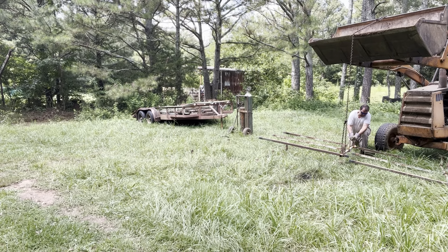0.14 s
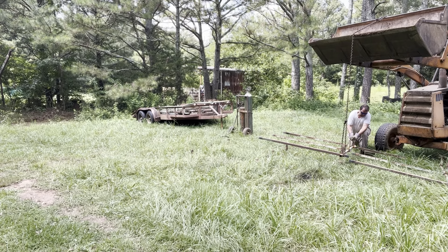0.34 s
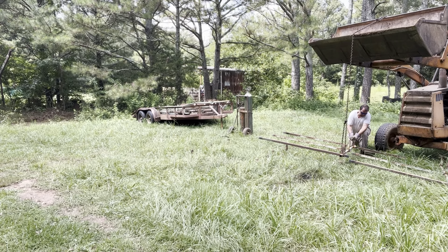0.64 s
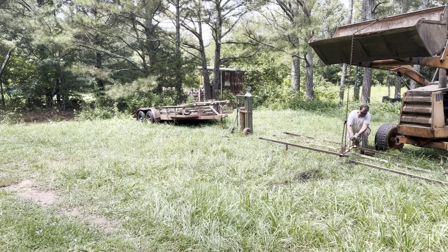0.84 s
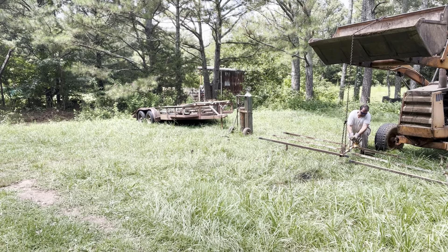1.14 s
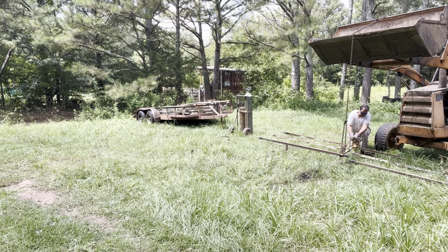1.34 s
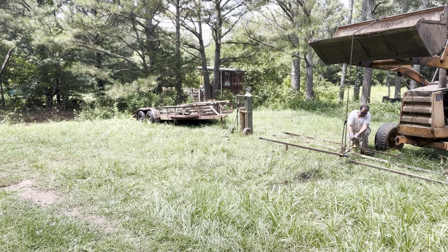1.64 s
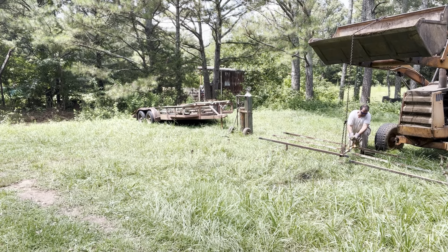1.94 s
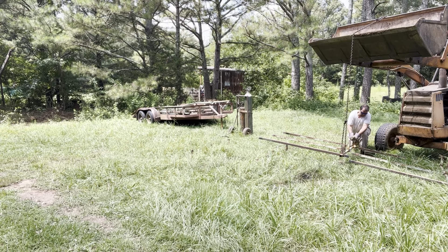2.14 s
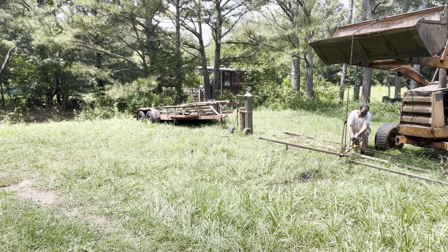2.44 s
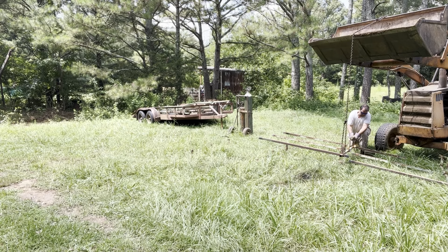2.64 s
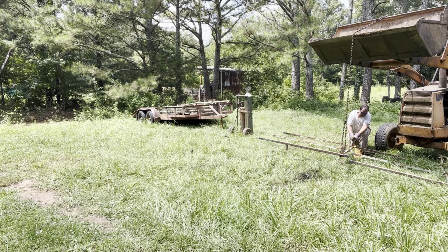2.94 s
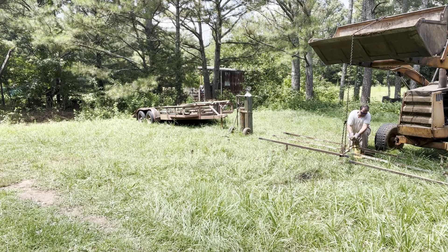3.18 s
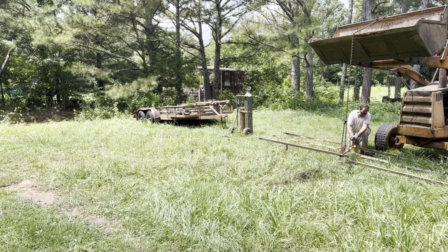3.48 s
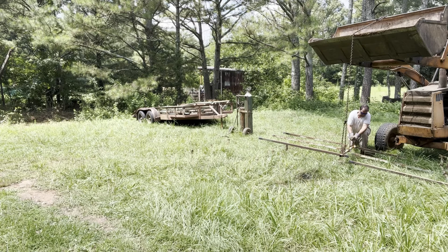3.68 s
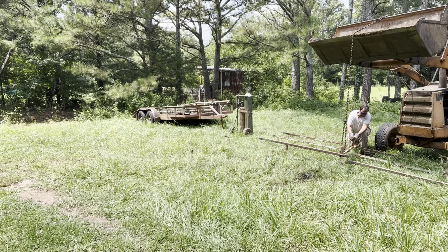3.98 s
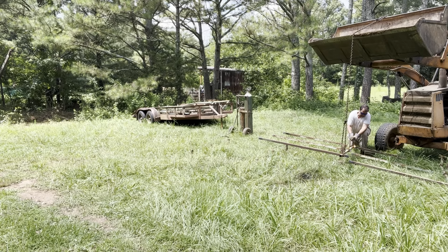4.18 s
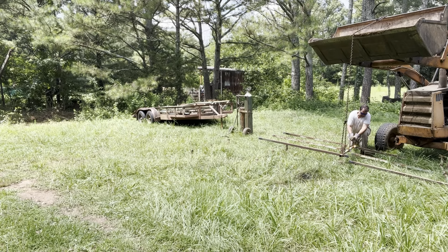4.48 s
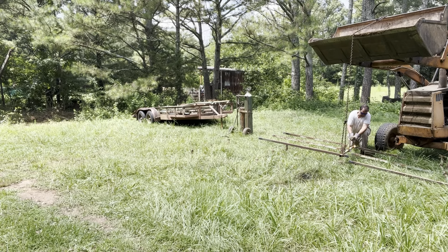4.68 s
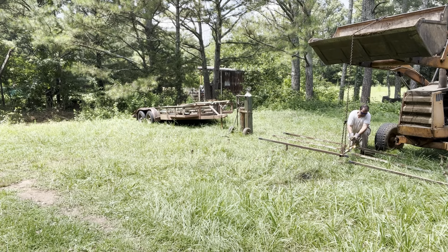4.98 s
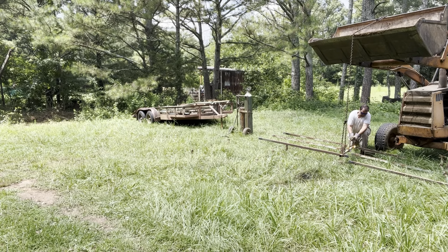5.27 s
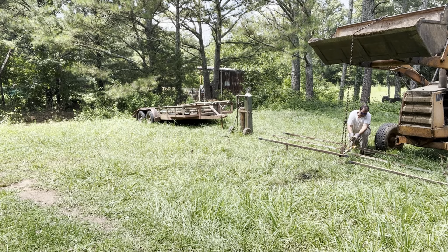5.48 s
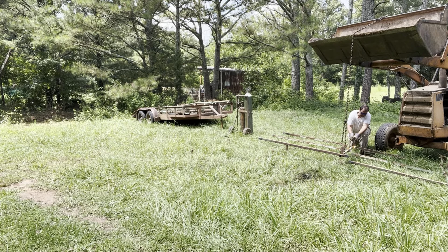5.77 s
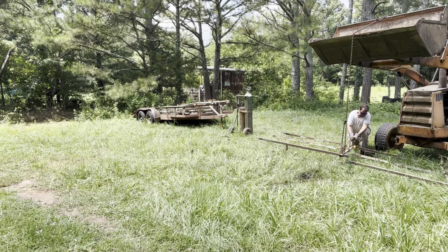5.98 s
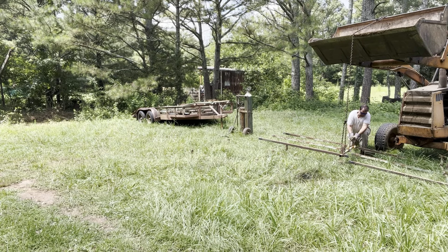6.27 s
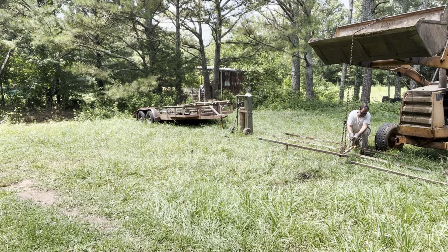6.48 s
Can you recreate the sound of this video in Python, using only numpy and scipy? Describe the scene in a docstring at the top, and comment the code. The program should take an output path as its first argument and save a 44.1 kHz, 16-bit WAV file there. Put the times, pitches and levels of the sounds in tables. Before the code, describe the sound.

Harsh, breathy torch jet cutting scrap metal some metres away, swelling and flaring, nearly dropping out near the end, above a low far-off hum.

```python
"""A gas torch cuts scrap steel on a lawn, some metres from a pair of microphones, under a loader's raised bucket.
From the start the oxygen jet hisses, wavering slightly at random throughout, and the bucket throws the hiss
back; far away an engine hums, its tones fading in and out over a low rumble. From half a second in, short
flares lift the jet. At 1 s it bites into the steel and fills out; at 5.9 s it nearly drops out, then partly recovers.
Jet, its faint grain and rumble are shaped noise; the engine is a set of sines tied to one shaft speed."""
import sys
import numpy as np
from scipy import signal
from scipy.fft import rfft, irfft
from scipy.io import wavfile

SR = 44100
rng = np.random.default_rng(int(sys.argv[2]) if len(sys.argv) > 2 else 0)


def output_pcm(signal):
    """Save a mono or channel-first signal as 16-bit PCM at the path in sys.argv[1].

    Samples are clipped to [-1, 1] before scaling.
    """
    pcm = np.clip(np.atleast_2d(signal).T, -1, 1) * 32767
    wavfile.write(sys.argv[1], SR, np.round(pcm).astype(np.int16))


N = 291942
TIME = np.arange(N) / SR
HZ = np.fft.rfftfreq(N, 1 / SR)
# the time and frequency grid on which the torch's level moves
FRAME_S = np.arange(N // 128 + 9) * 128 / SR
BIN_HZ = np.fft.rfftfreq(512, 1 / SR)


def amp(db):
    """Decibels to gain."""
    return 10 ** (np.asarray(db) / 20)


def unit(x):
    """Scales to an rms of 1."""
    return x / np.sqrt(np.mean(x ** 2) + 1e-20)


def over_hz(table, hz, axis=1):
    """One column of a table, read along log frequency."""
    table = np.array(table)
    return np.interp(np.log(hz + 1), np.log(table[:, 0] + 1), table[:, axis])


def over_time(table, t):
    """All columns of a curve, read at the times t."""
    s, *columns = np.transpose(table)
    return [np.interp(t, s, column) for column in columns]


def drift(t, rate):
    """Slow chance of rms 1, its changes rolling off above the given rate a second."""
    f = np.fft.rfftfreq(len(t), t[1] - t[0])
    lowpass = (f > 0) / np.sqrt(1 + (f / rate) ** 4)
    return unit(irfft(rfft(rng.standard_normal(len(t))) * lowpass, len(t)))


def patches(span_s, span_hz):
    """A random field of rms 1 over time and frequency, smooth within the given spans."""
    z = np.fft.fft2(rng.standard_normal((len(FRAME_S), len(BIN_HZ))))
    along = np.fft.fftfreq(len(FRAME_S), FRAME_S[1])[:, None] * span_s
    across = np.fft.fftfreq(len(BIN_HZ), BIN_HZ[1]) * span_hz
    return unit(np.fft.ifft2(z * np.exp(-along ** 2 - across ** 2)).real)


def ports(spectra):
    """Two microphone ports: sound from the right reaches the left one late and shaded, and partly unlike."""
    # how the ports differ: hz, left_lead_radians, likeness (0-1), left_over_right_db
    port_table = [(100, -0.3, 0.97, -0.4), (200, -0.55, 0.95, -0.5), (330, -0.75, 0.91, -1.5),
                  (550, -1.15, 0.85, -4.4), (900, -1.3, 0.65, -8), (1300, -1.42, 0.9, -5),
                  (1900, -2.1, 0.88, -0.6), (2150, -3.12, 0.995, 0), (2850, -3.17, 0.995, 0),
                  (3300, -4.8, 0.68, -0.6), (4300, -5.6, 0.68, -2.7), (5200, -7.5, 0.62, -4.4),
                  (6000, -8.5, 0.2, -1.8), (6700, -10.5, 0.62, 1.3), (7400, -10.65, 0.75, 4.3),
                  (8600, -10.4, 0.88, 1.5), (9500, -9.95, 0.87, 0.5), (9900, -9.45, 0.995, 0),
                  (12200, -9.4, 0.995, 0), (12900, -8.85, 0.81, 0), (15200, -7.7, 0.76, 0)]
    lead, likeness, balance_db = (over_hz(port_table, HZ, axis=k) for k in range(1, 4))
    likeness = np.clip(likeness, 0, .995)
    mixed = likeness * spectra[0] + np.sqrt(1 - likeness ** 2) * spectra[1]
    left = mixed * np.exp(1j * lead)
    return irfft(np.array([left * amp(balance_db / 2), spectra[0] * amp(-balance_db / 2)]), N)


def grain(per_s, spread_db):
    """A faint random grain that slightly roughens the hiss: sparse single samples of uneven size."""
    size = amp(spread_db * np.minimum(rng.exponential(1, N), 4)) * rng.choice([-1, 1], N)
    return unit(size * (rng.random(N) < per_s / SR))


def scatter(x, share, decay_s, turns_per_s):
    """Weak reflections ripple the spectrum finely; the pattern shifts slowly as the torch moves."""
    # two random tails, none of it within the first millisecond
    taps = rng.standard_normal((2, N)) * np.exp(-TIME / decay_s) * (TIME > .001)
    one, other = (irfft(rfft(x) * rfft(tail / np.linalg.norm(tail)), N) for tail in taps)
    turn = 2 * np.pi * turns_per_s * TIME
    return x + share * (np.cos(turn) * one + np.sin(turn) * other)


def whistles(flow):
    """The jet blows across the edges of the cut: narrow bands of the hiss swell, slide and fade."""
    # breathy whistles that change with the cut's shape: start_s, end_s, start_hz, end_hz, width_hz, lift_db
    whistle_table = [(-.3, 1.0, 6950, 7000, 150, 3), (1.2, 2.9, 7000, 7180, 180, 4.5),
                     (2.6, 4.3, 7160, 7120, 190, 5), (4.3, 6.9, 7140, 7230, 220, 4.5),
                     (1.2, 3.3, 4035, 4045, 60, 6), (3.0, 4.3, 4030, 3940, 80, 4.5),
                     (1.0, 2.1, 4270, 4220, 80, 4), (1.0, 1.7, 5330, 5340, 90, 4),
                     (2.7, 3.5, 5330, 5310, 120, 3.5), (2.7, 4.4, 6650, 6670, 80, 7),
                     (4.9, 6.9, 6660, 6645, 80, 5.5), (-.3, 2.9, 8385, 8405, 100, 4),
                     (4.8, 6.9, 8410, 8410, 120, 3.5), (2.9, 3.9, 8840, 8900, 150, 3),
                     (2.5, 2.95, 2860, 2900, 170, 6), (3.1, 3.55, 2820, 2800, 130, 4.5),
                     (4.0, 4.6, 2840, 2830, 80, 4), (1.15, 1.72, 10950, 11100, 350, 5),
                     (2.0, 2.4, 11000, 10900, 250, 3.5), (3.9, 4.27, 8740, 8800, 230, 6),
                     (3.85, 4.27, 10220, 10330, 220, 5), (3.95, 4.25, 10850, 10950, 220, 5.5),
                     (4.58, 4.84, 10100, 10200, 400, 7), (4.66, 4.84, 11100, 11220, 350, 6),
                     (4.6, 4.86, 8150, 8150, 300, 3.5), (4.97, 5.35, 12300, 12430, 280, 6)]
    longest_fade_s = .3
    hz, t, z = signal.stft(flow, SR, nperseg=2048, noverlap=1536)
    lift_db = np.zeros(z.shape[1:])
    for start, end, from_hz, to_hz, width, db in whistle_table:
        fade_s = min(longest_fade_s, (end - start) / 3)
        swell = np.clip(np.minimum(t - start, end - t) / fade_s, 0, 1)
        centre = np.interp(t, [start, end], [from_hz, to_hz])
        lift_db = lift_db + db * swell / (1 + (2 * (hz[:, None] - centre) / width) ** 2)
    return signal.istft(z * amp(lift_db), nperseg=2048, noverlap=1536)[1][:, :N]


def flare(start, length):
    """A flare rises, holds and falls: 0-1."""
    rise_s, fall_s = 0.0047, 0.03
    rise = (FRAME_S - start) / rise_s
    fall = 1 - (FRAME_S - start - length) / fall_s
    return np.clip(np.minimum(rise, fall), 0, 1)


def band_levels(body_db=3.0, roar_db=-2.5, rush_db=1.08):
    """Relative dB of body, roar, rush, hiss and top: flares lift the flow; the low parts follow it less."""
    # the jet's steady flow: time_s, strength_db (relative)
    jet_curve = [(0, -42), (.6, -39.3), (.88, -40.8), (.97, -41), (1.02, -38), (1.2, -34.5), (1.5, -34),
                 (1.8, -35.5), (2.15, -35), (2.36, -38), (2.52, -35.3), (2.8, -37.3), (3.27, -33.3),
                 (3.48, -36.8), (3.75, -35), (4.05, -35.2), (4.2, -37.3), (4.45, -40.7), (4.72, -35.5),
                 (4.86, -37), (4.95, -34.7), (5.84, -35.6), (5.93, -44.8), (5.99, -45), (6.04, -42),
                 (6.3, -39.7), (6.62, -39.8)]
    # slow changes of colour: time_s, roar_db, rush_db, top_db (all relative)
    colour_curve = [(0, -1.3, -3.5, -2), (.8, -4, -4, 0), (1.25, -0.5, -2.5, 1), (1.6, 1.5, 0, 0.5),
                    (2.1, 1.5, 1, -1), (2.62, -0.3, -0.4, -3), (2.85, 2.5, -1.5, -5.5), (3.25, 0, -0.5, 2),
                    (3.5, 0.5, 0.5, -2.5), (3.9, .5, -0.4, -2.5), (4.13, 0.5, -2, -3), (4.42, 4, 2.5, -3),
                    (4.85, 0, 0.4, -1.5), (5.7, -2.3, -2, 0), (6.33, 1.5, 0.5, 1.5), (6.62, 2, 0, 0)]
    # flares as the jet blows molten metal out of the cut:
    # start_s, length_s, lift_db, further_roar_lift_db, further_rush_lift_db
    flare_table = [(0.523, 0.072, 0.5, -1.5, 0), (0.735, 0.028, 2.5, -0.5, -2), (1.343, 0.12, 3.7, 0, -2.5),
                   (1.52, 0.07, 4, -1, -1.5), (1.671, 0.056, 4.2, 1, -1), (1.886, 0.048, 2, 4.5, 0),
                   (2.018, 0.037, 2.5, 3, -1), (2.226, 0.036, 4.7, 2.5, -1), (2.406, 0.036, 5, 2.5, 0),
                   (3.2, 0.05, 0, 1.5, 0), (3.385, 0.025, 0.5, 2, 0), (3.55, 0.07, 3, 1, 0),
                   (3.86, 0.12, 2.8, 4, -1.5), (4.677, 0.045, 4, 2.5, -4), (4.745, 0.045, 4.5, 3, -4),
                   (4.865, 0.03, 0, 4, 1)]
    # the flow at ordinary work, and the shares of its changes that body and roar follow
    work_db, body_follows, roar_follows = -39, 0.33, 0.55
    # the body of the flame fills out when the jet pierces the steel
    pierce_s, pierce_rise_s, unpierced_db = 1.11, 0.12, -10

    jet, = over_time(jet_curve, FRAME_S)
    roar, rush, top = over_time(colour_curve, FRAME_S)
    for start, length, jet_lift, roar_lift, rush_lift in flare_table:
        shape = flare(start, length)
        jet = jet + jet_lift * shape
        roar = roar + roar_lift * shape
        rush = rush + rush_lift * shape
    # the jet spits as it first bites: a 4 dB lift of the rush
    rush = rush + 4.0 * flare(start=.998, length=.03)
    unpierced = 1 - np.clip((FRAME_S - pierce_s) / pierce_rise_s, 0, 1)
    body = work_db + body_db + body_follows * (jet - work_db) + unpierced_db * unpierced
    roar = work_db + roar_db + roar_follows * (jet - work_db) + roar
    return body, roar, jet + rush_db + rush, jet, jet + top


def kerf():
    """The slot in the steel rasps with one broad resonance: its lift in dB over time and frequency."""
    # the resonance, strongest while the cut is deep: time_s, lift_db
    kerf_curve = [(0, -1), (.95, -1), (1.15, 3.5), (1.5, 1.5), (2.4, 2), (2.7, 3), (3.3, 2.5), (4.3, 1.5),
                  (4.8, 0), (5.8, 0), (6, 1.5), (6.62, 0)]
    centre_hz, width_hz = 2600, 600
    lift_db, = over_time(kerf_curve, FRAME_S)
    return np.outer(lift_db, np.exp(-((BIN_HZ - centre_hz) / width_hz) ** 2))


def bucket_echo(share, fade_hz):
    """The bucket returns the hiss upside down a moment later, combing the middle of the spectrum."""
    delay_s = .00847
    strength = share * HZ ** 2 / (HZ ** 2 + 600 ** 2) / (1 + (HZ / fade_hz) ** 2)
    return (1 - strength * np.exp(-2j * np.pi * HZ * delay_s)) / np.sqrt(1 + strength ** 2)


def torch(level_db=-29.0, waver_db=.5, patchy_db=1.0, grain_db=-17):
    """Jet turbulence with a faint grain, coloured by the cut and by the echoes round it."""
    # the torch's broad spectrum at full work: hz, density_db (per Hz, relative)
    hiss_table = [(60, -28), (400, -11.5), (850, -9.5), (1200, -4.5), (1750, -0.9), (2100, -2.5),
                  (2400, -3.8), (3300, -4.2), (4300, -3.1), (5250, -1.4), (5650, -3.9), (6050, -5.3),
                  (6450, -3.6), (7050, -2.2), (7600, -3.7), (8100, -1.6), (8900, 0), (9700, -3.7),
                  (11100, -3.4), (11950, -7.4), (12500, -4.2), (13100, -3.2), (13600, -5.2), (14500, -2.7),
                  (15400, -4.2)]
    # steady resonances of nozzle and steel: hz, width_hz, lift_db
    cut_modes = [(1008, 45, 5.5), (1136, 40, 4.8), (1368, 60, 3.5), (1700, 90, 2), (1830, 50, 7),
                 (2850, 130, 1.5), (3170, 70, 3), (3430, 70, 3), (3820, 90, 2), (4042, 60, 3),
                 (4995, 70, 2.5), (5210, 110, 1.5), (10480, 120, 1.5)]

    # body, roar, rush, hiss and top, cross-faded between each pair of edges
    edges_hz = [700, 1050, 2400, 3500, 5800, 7200, 10500, 12500]
    parts = [np.interp(BIN_HZ, edges_hz, np.repeat(row, 2)[1:-1]) for row in np.eye(5)]
    field_db = sum(np.outer(db, part) for db, part in zip(band_levels(), parts))
    field_db = field_db + kerf()
    # the hiss wavers slightly at random throughout, as a whole and in patches
    field_db = field_db + waver_db * drift(FRAME_S, rate=35)[:, None]
    field_db = field_db + patchy_db * patches(span_s=0.034, span_hz=2740)
    # narrow bands slowly swell and fade, most in the treble
    swell_db = np.interp(BIN_HZ, [1000, 6000, 11000], [.3, 1.1, 1.5])
    field_db = field_db + patches(span_s=.4, span_hz=380) * swell_db

    flow = rng.standard_normal((2, N)) + amp(grain_db) * grain(per_s=300, spread_db=5.5)
    flow = scatter(flow, share=.36, decay_s=.016, turns_per_s=.3)
    flow = whistles(flow)
    z = signal.stft(flow, nperseg=512, noverlap=384)[2]
    z = z * amp(field_db.T[:, :z.shape[-1]])
    flow = signal.istft(z, nperseg=512, noverlap=384)[1][:, :N]

    resonance_db = sum(db / (1 + (2 * (HZ - hz) / width) ** 2) for hz, width, db in cut_modes)
    colour_db = over_hz(hiss_table, HZ) + resonance_db
    echo = bucket_echo(share=.42, fade_hz=3500)
    return amp(level_db) * unit(ports(rfft(flow) * amp(colour_db) * echo))


def engine(hum_db=-0.5, octave_db=-1.0, weak_db=-1.5, wobble=0.0008, fading_db=1.0, fading_per_s=6):
    """Low far tones that follow the shaft's speed; moving air makes each swell and fade on its own."""
    # the shaft: time_s, speed_hz (before the wobble)
    speed_curve = [(0, 25.15), (.4, 25.55), (1.25, 25.7), (1.7, 26.05), (2.4, 26.15), (3.1, 26.0),
                   (3.6, 25.75), (4.25, 26.25), (4.9, 26.25), (5.35, 26.0), (5.85, 26.45), (6.62, 26.15)]
    # the firing tone, 4th order, fading on its way: time_s, level_db (before hum_db and fading)
    hum_curve = [(0, -46.5), (.68, -46.5), (.78, -38), (.93, -39.5), (1.05, -44.5), (1.7, -44),
                 (2.0, -52.5), (2.68, -40), (3.1, -41), (3.45, -51.5), (3.8, -44), (4.05, -70),
                 (4.18, -44.5), (4.36, -52), (4.55, -46.5), (5.0, -43.5), (5.4, -48), (5.85, -41.5),
                 (6.45, -42), (6.62, -50)]
    # the octave of that tone: time_s, level_db (before octave_db and fading)
    octave_curve = [(0, -55), (.25, -49.5), (.55, -48.5), (.75, -54), (1.1, -49.5), (1.65, -47.5),
                    (1.9, -53), (2.45, -53), (2.95, -67), (3.3, -60), (3.65, -49.5), (3.95, -57),
                    (4.4, -56), (4.75, -59), (5.07, -49), (5.7, -60), (6.62, -60)]
    # weaker tones that swell and fade:
    # order (multiple of shaft speed), loudest_s, level_db (before weak_db and fading), fade_db_per_s
    undertones = [(2.02, .2, -51, 12), (2.02, 7.8, -54.5, 1), (5.12, 0.28, -51, 5), (5.12, 2.76, -55, 3.5),
                  (6.15, 1.03, -50.5, 9.5)]

    speed, = over_time(speed_curve, TIME)
    angle = 2 * np.pi * np.cumsum(speed * (1 + wobble * drift(TIME, rate=7.6))) / SR
    firing, = over_time(hum_curve, TIME)
    octave, = over_time(octave_curve, TIME)
    tones = [(4, firing + hum_db), (8, octave + octave_db)]
    for order, loudest, db, fade in undertones:
        tones.append((order, weak_db + db - fade * abs(TIME - loudest)))
    hum = 0
    for order, db in tones:
        gain = amp(db + fading_db * drift(TIME, rate=fading_per_s))
        hum = hum + gain * np.sin(order * angle + 2 * np.pi * rng.random())
    return ports([rfft(np.sqrt(2) * hum), 0])


def outdoors(level_db=-48.0):
    """A low far rumble: noise shaped to the outdoor background."""
    # the background's spectrum: hz, density_db (per Hz, relative)
    rumble_table = [(10, -36), (24, -15), (32, -24), (44, -2.5), (56, -2.5), (72, -2), (95, -0.5),
                    (125, -3), (165, -9), (230, -9), (330, -10), (600, -14), (1500, -21), (6000, -71)]
    noise = rfft(rng.standard_normal((2, N)))
    return amp(level_db) * unit(ports(noise * amp(over_hz(rumble_table, HZ))))


def scene():
    """The torch over the far engine and the outdoor rumble."""
    return torch() + engine() + outdoors()


def record(dry):
    """The recorder's band limit: a steep low-pass."""
    edge_hz = 15790
    lowpass = signal.firwin(511, edge_hz, window=("kaiser", 9), fs=SR)
    return signal.oaconvolve(dry, lowpass[None], "same")


dry = scene()
out = record(dry)
output_pcm(out)
```